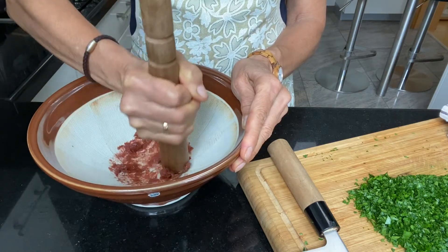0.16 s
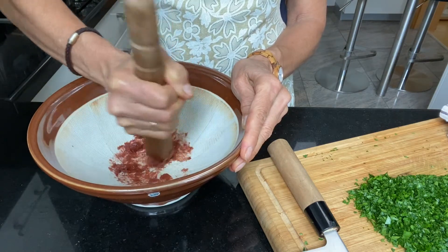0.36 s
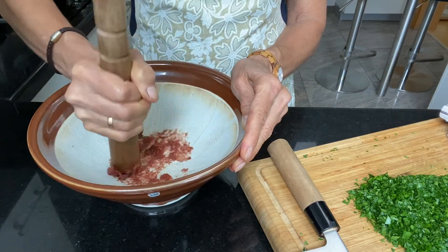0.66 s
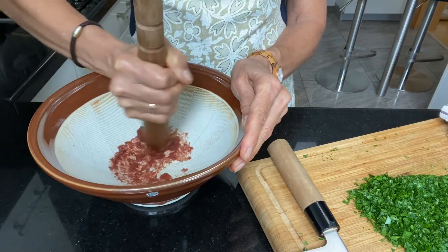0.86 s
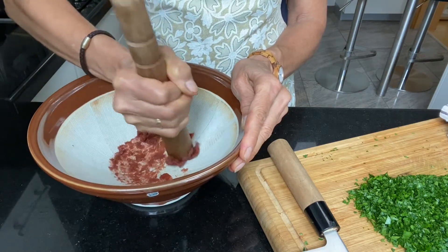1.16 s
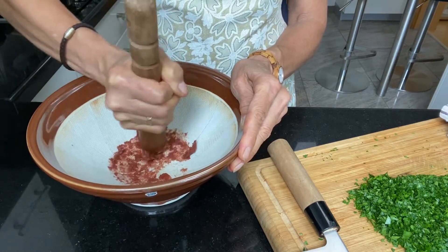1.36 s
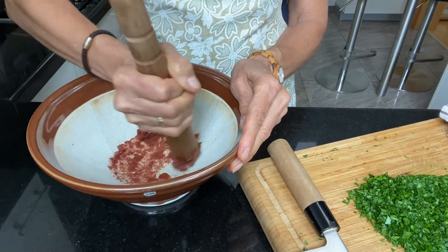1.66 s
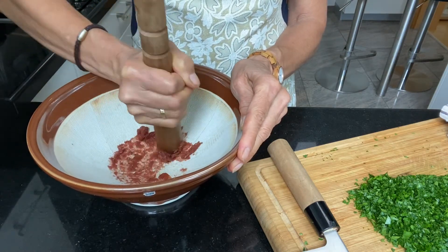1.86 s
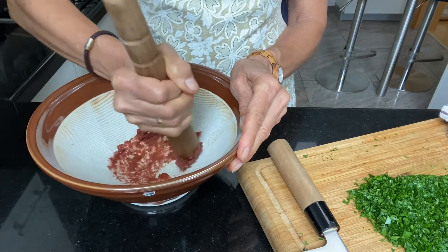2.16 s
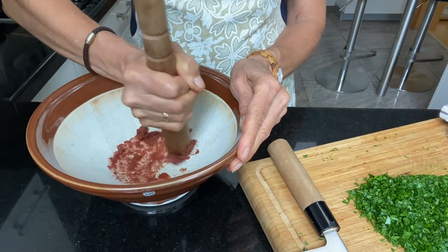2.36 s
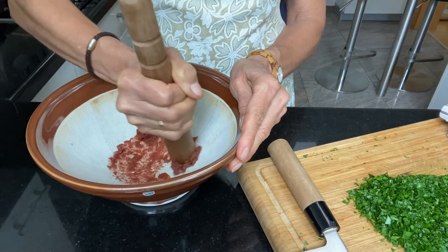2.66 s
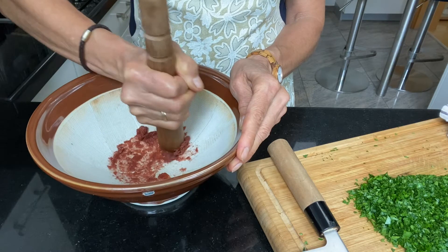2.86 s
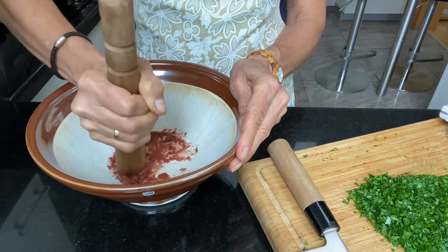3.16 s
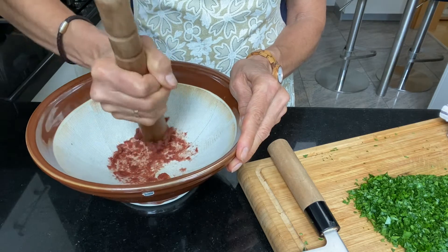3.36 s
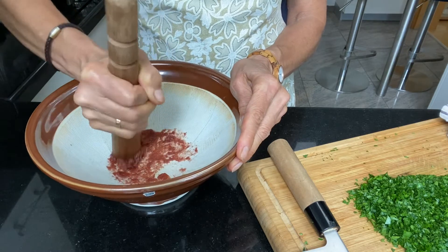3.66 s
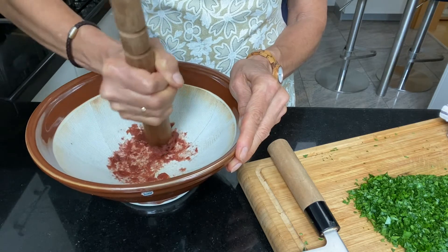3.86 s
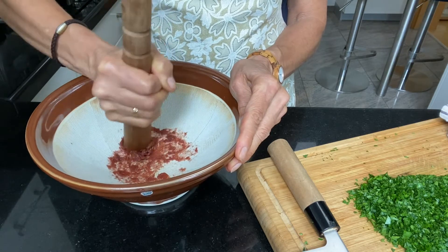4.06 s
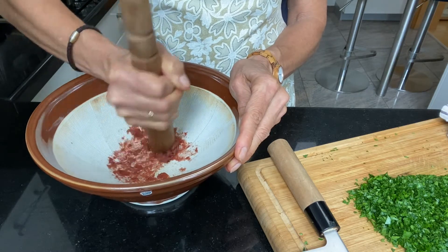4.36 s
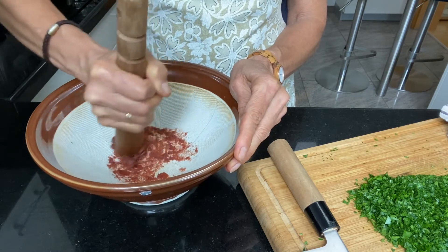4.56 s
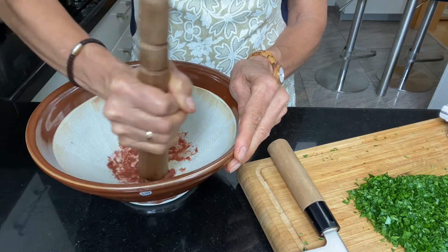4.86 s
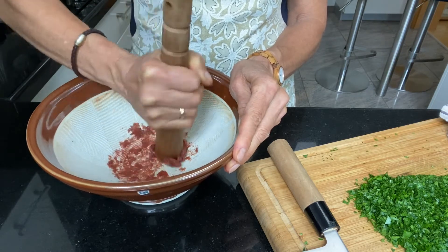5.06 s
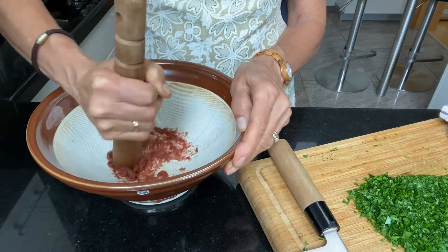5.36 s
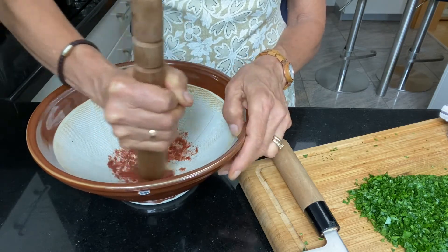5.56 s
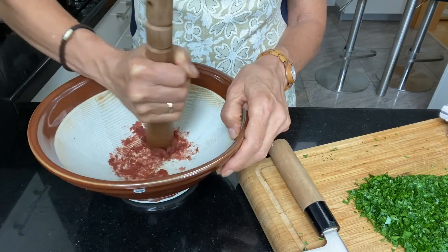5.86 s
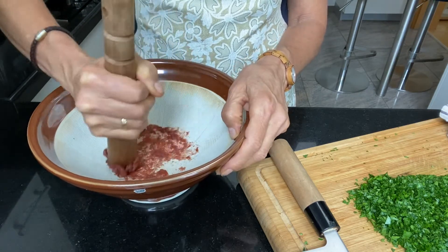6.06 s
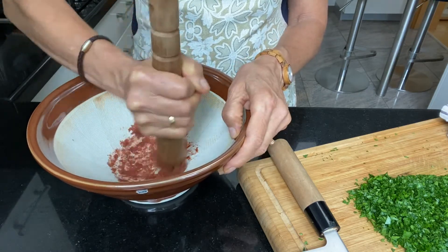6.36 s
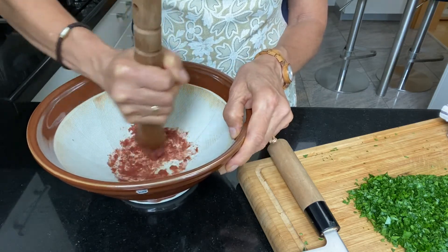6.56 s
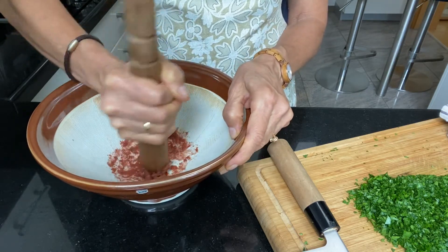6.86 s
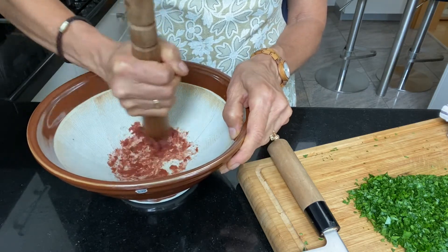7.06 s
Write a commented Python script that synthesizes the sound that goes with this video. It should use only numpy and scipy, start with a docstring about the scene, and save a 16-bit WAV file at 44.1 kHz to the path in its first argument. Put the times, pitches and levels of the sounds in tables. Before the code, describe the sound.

Close, gritty grinding of damp paste in a ceramic bowl, with irregular wooden knocks, short rings and soft thuds.

```python
"""A pestle scrapes and clacks round a ridged ceramic bowl, close up on a stone kitchen counter.
Its wooden tip slips over the ridges and rings the bowl, the push rocks bowl and counter,
and the moist paste hisses and pops. A faint hum, room air and a short kitchen echo lie behind.
The microphone's two ports hear the treble out of step."""
import sys
import numpy as np
from scipy import signal
from scipy.fft import rfft, irfft, next_fast_len
from scipy.io import wavfile
from scipy.ndimage import uniform_filter1d

SR = 44100
rng = np.random.default_rng(int(sys.argv[2]) if len(sys.argv) > 2 else 0)


def pcm_store(signal):
    """Save signal as 16-bit PCM."""
    levels = np.round(np.clip(np.atleast_2d(signal), -1, 1) * 32767)
    wavfile.write(sys.argv[1], SR, levels.astype(np.int16).T)


N = 317961

# pestle strokes: (start [s], length [s], scrape [dB], push [dB], counter shake [dB], hiss [dB], grit [dB])
STROKES = [(-0.12, 0.15, -25, -34.5, -42, -53, -29), (0.055, 0.21, -39.5, -36.5, -44, -56.5, -46.5),
           (0.591, 0.15, -51, -52, -43.5, -55, -55), (0.716, 0.16, -37.5, -39.5, -45, -51, -50),
           (1.125, 0.098, -26.5, -32, -31, -56, -34), (1.267, 0.18, -39, -43.5, -39.5, -53.5, -45.5),
           (1.703, 0.22, -39.5, -47.5, -40, -49, -47.5), (2.12, 0.2, -60, -71, -47, -69, -63),
           (2.312, 0.15, -64, -37.5, -38, -49.5, -40.5), (2.618, 0.086, -42, -40, -34, -73, -79),
           (2.703, 0.13, -33.5, -38, -47, -60, -40.5), (2.762, 0.24, -39.5, -45.5, -39.5, -54, -45.5),
           (2.953, 0.095, -56, -42, -38, -49, -45), (3.345, 0.17, -41, -40.5, -43.5, -63, -45),
           (3.513, 0.17, -59, -40.5, -47, -58, -46.5), (3.831, 0.18, -41, -43, -41, -66, -47),
           (3.951, 0.23, -57, -44.5, -44.5, -54.5, -47.5), (4.213, 0.1, -61, -54, -44, -55, -84),
           (4.317, 0.22, -43.5, -42, -46.5, -53, -44), (4.41, 0.28, -61, -44.5, -47, -56.5, -45.5),
           (4.693, 0.14, -42, -47.5, -47, -53.5, -51), (4.874, 0.35, -47, -49.5, -47.5, -61, -62),
           (5.078, 0.23, -52, -51, -46.5, -60, -44.5), (5.269, 0.11, -43, -36.5, -56, -67, -41.5),
           (5.406, 0.18, -45.5, -45, -51.5, -53.5, -43), (5.582, 0.14, -39, -36, -52, -76, -53),
           (5.694, 0.25, -42, -43.5, -45, -56.5, -48.5), (5.887, 0.18, -54, -47, -47, -59.5, -42.5),
           (6.04, 0.37, -52, -48.5, -55, -55.5, -49.5), (6.313, 0.18, -39.5, -45, -50, -53, -39),
           (6.461, 0.29, -52.5, -43.5, -42.5, -59.5, -42.5), (6.701, 0.18, -46.5, -40.5, -51, -52.5, -44.5),
           (6.861, 0.18, -41.5, -37.5, -48, -54, -69), (7.018, 0.19, -42.5, -41, -44, -49.5, -36)]
# the tip catches a ridge: (time [s], ring [dB], thud re ring [dB], rasp re ring [dB], t60 [s], spot [Hz])
CATCHES = [(0.073, -30, 18.5, -2, 0.077, 640), (0.154, -26, 7, -19, 0.086, 595),
           (0.249, -18, -32, -19, 0.084, 810), (0.611, -40, -2, -10, 0.06, 820),
           (0.716, -31, 8, -3, 0.035, 1300), (0.768, -35, -8, -12, 0.19, 1350),
           (0.937, -31, -13, -37, 0.095, 740), (1.147, -10.5, -5, -40, 0.033, 816),
           (1.164, -49, -13, -30, 0.034, 690), (1.256, -19, -32, -6.5, 0.055, 780),
           (1.299, -17, -26, -16, 0.05, 980), (1.36, -19.5, 1.5, -18, 0.021, 1230),
           (1.74, -26.5, 1, -39, 0.081, 807), (1.782, -15, -14, -15, 0.12, 780),
           (1.822, -20.5, -20, -7, 0.084, 760), (1.853, -32, -15, -4, .09, 1250),
           (2.154, -34, 0.5, -14, 0.05, 650), (2.343, -14.5, -11, -11, 0.065, 760),
           (2.351, -24, -30, -18, 0.048, 1680), (2.397, -15.5, -5, -35, 0.033, 730),
           (2.403, -29, -30, -8, .06, 1700), (2.643, -25.5, 5.5, -44, 0.038, 590),
           (2.727, -24, -1, -7, 0.057, 1060), (2.836, -15, -37, -10, 0.07, 810),
           (2.878, -26, -20, -18, 0.036, 910), (2.921, -17.5, -18, -23, 0.063, 970),
           (3.001, -44, 6, -20, 0.082, 700), (3.315, -36.5, -8, -37.5, 0.057, 630),
           (3.396, -18, -27, -42, 0.064, 750), (3.405, -30, -18, -28, 0.048, 1230),
           (3.56, -27.5, 8.5, 0, 0.053, 586), (3.839, -28, -6, -40, 0.066, 700),
           (4.071, -40, -6, 4, 0.13, 1350), (4.254, -41.5, 17.5, 0, 0.039, 620),
           (4.335, -29, 0.5, -15, 0.086, 650), (4.407, -34, -17, -23, 0.093, 625),
           (4.48, -41, -2, -3.5, 0.32, 619), (4.791, -42, -7, -5, 0.027, 600.4),
           (4.822, -43, -10, -10, 0.019, 1500), (4.925, -45, 17, 2, 0.15, 950),
           (5.112, -27, -30, -41, 0.16, 800), (5.138, -34.5, -24, -31, 0.17, 935),
           (5.163, -29, -15, -22, 0.027, 640), (5.175, -19, -5.5, -24, 0.05, 1230),
           (5.19, -21, -15, -8.5, 0.05, 715), (5.215, -34, -15, -20, .05, 1190),
           (5.296, -25.5, -30, -37, 0.12, 880), (5.445, -27.5, -26, -34, 0.071, 700),
           (5.497, -20.5, -30, -41, 0.12, 820), (5.627, -28, 13.5, -19, 0.054, 620),
           (5.722, -21.5, -12, -13.5, 0.2, 860), (5.742, -21, -4, -26, 0.051, 730),
           (5.785, -21.5, -27, -13, 0.088, 765), (5.822, -40, -9, -29, 0.088, 710),
           (5.893, -30.5, 7, -18, 0.04, 627), (6.19, -40, 3.5, -22, 0.16, 650),
           (6.278, -45, -3, 12, .04, 1290), (6.342, -38.5, 14.5, -5, 0.081, 1290),
           (6.376, -35, 12, -6, 0.045, 646), (6.404, -33, -11, 7, 0.027, 654),
           (6.434, -31, -13, -15, 0.028, 1320), (6.461, -30, -7, -22, 0.047, 646),
           (6.517, -34, -4, -10, 0.054, 900), (6.547, -31.5, 4, -15, 0.03, 650),
           (6.487, -28.5, 3, -25, 0.096, 640), (6.615, -45, 2, -13, 0.027, 1300),
           (6.645, -39, 5, -10, 0.08, 1250), (6.797, -45, -9, -2, 0.13, 800),
           (6.834, -32, -11, -20, 0.038, 710), (6.88, -35, 16, -3, 0.12, 686),
           (6.908, -32.5, -8, 3, 0.03, 649), (6.946, -24, -27, 3, 0.024, 780),
           (6.973, -32.5, -13, -17, 0.029, 1250), (7.04, -34, -5, -20, 0.041, 720),
           (7.127, -29.5, -11.5, -0.5, 0.052, 700)]
# rings of glaze and ridges that colour hiss and rasp: (centre [Hz], width [Hz], boost [dB])
GLAZE = [(2270, 360, 3.5), (4410, 800, 6), (6520, 160, 14), (6970, 100, 10), (7730, 150, 4.5),
         (9300, 270, 2)]
RISE_S = 0.00372  # a contact starts this long before its sharpest rise


def gain_of(db):
    """Decibels to amplitude."""
    return 10 ** (np.asarray(db) / 20)


def evened(x):
    """Scales to rms 1."""
    return x / np.sqrt(np.mean(x ** 2) + 1e-20)


def read(points, hz):
    """A curve's value at hz, on a log frequency axis."""
    f, value = np.transpose(points)
    return np.interp(np.log(hz + 1), np.log(f), value)


def stroke(column, peak, start_db, end_db, onset_s):
    """Gain from a STROKES column: fades in, bends at the share `peak` of each stroke, dies away."""
    out = np.zeros(N)
    for row in STROKES:
        first = max(round(row[0] * SR), 0)
        t = np.arange(first, min(first + SR, N)) / SR - row[0]
        past = t / row[1] - peak
        fall_db = end_db * (abs(past) / (1 - peak)) ** 1.4
        shape_db = np.where(past < 0, start_db * (past / peak) ** 2, fall_db)
        out[first:][:len(t)] += gain_of(row[column] + shape_db) * np.clip(t / onset_s, 0, 1)
    return out


def lumpy(per_s, spread_db, fade_ms, bed):
    """An uneven force: random slips that swell fast and fade, over a steady bed; rms 1."""
    slips = gain_of(spread_db * np.minimum(rng.exponential(1, N), 3)) * (rng.random(N) < per_s / SR)
    for share in (1, .3):  # the fall, then the shorter rise
        slips = signal.lfilter([1], [1, -np.exp(-1000 / (share * fade_ms * SR))], slips)
    return evened(bed + evened(slips))


def bursts(seconds, db, t60, rise_ms, knee):
    """Event envelopes; knee 1 falls exponentially, more holds and lets go; db may have a row per mode."""
    db = np.atleast_2d(db)
    out, t = np.zeros((len(db), N)), np.arange(SR // 5) / SR
    for s, gain, fall in zip(seconds, gain_of(db).T, t60):
        shape = gain_of(-60 * (t / fall) ** knee) * (1 - np.exp(-1000 * t / rise_ms))
        part = out[:, max(round(s * SR), 0):][:, :len(t)]
        part += gain[:, None] * shape[:part.shape[1]]
    return out


def ring(modes, force, own, soft_hz, wander=0., patchy_db=0., blows=0., skirt=0.):
    """Modes driven by blows and noise, partly each one's own; hand and paste vary pitch and strength."""
    out, (shared, other) = np.zeros((2, N)), rng.standard_normal((2, N))
    knots = rng.standard_normal((len(modes), 2, 120))
    forces = force * np.ones((len(modes), 1))
    for (hz, width, db, pan_db, lead), push, knot in zip(modes, forces, knots):
        other = np.roll(other, N // 19)
        drift, patch = (np.interp(np.linspace(0, len(k) - 1, N), range(len(k)), k) for k in knot)
        drive = push * (np.sqrt(1 - own ** 2) * shared + own * other + blows) * gain_of(patchy_db * patch)
        r, turn = np.exp(-np.pi * width / SR), np.exp(2j * np.pi * hz / SR)
        z = signal.lfilter([np.sqrt(1 - r * r)], [1, -r * turn], drive)
        if skirt:  # a second resonance, this many times as wide, builds the ring up softly
            soft = r ** skirt
            z = signal.lfilter([1 - soft], [1, -soft * turn], z)
        z = z * np.exp(2j * np.pi * np.cumsum(wander * hz * drift) / SR)
        out[0] += gain_of(db + pan_db / 2) * (z * np.exp(1j * lead)).real
        out[1] += gain_of(db - pan_db / 2) * z.real
    out /= np.sqrt(np.sum(gain_of(np.array(modes)[:, 2]) ** 2) / 2)
    cushion = signal.butter(2, soft_hz, fs=SR, output="sos")  # wood and paste soften the contact
    return signal.sosfilt(cushion, out)


def at_ports(spectrum, a, b, rings=()):
    """Colours signal a; the microphone's right port hears it phase-shifted and partly replaced by b."""
    # between the ports: (frequency [Hz], left lead [rad], likeness [0-1])
    ports = [(150, 1.5, 1), (920, 2, 0.85), (2380, -1, 0.2), (6050, -1.46, 0.89), (8530, 0.82, 1),
             (10350, 3, 1), (13940, 8, 1), (14900, 8.5, 0.95)]
    size = next_fast_len(N + 4096)
    hz = np.fft.rfftfreq(size, 1 / SR)
    f, lead, alike = np.transpose(ports)
    lead, alike = np.interp(hz, f, lead), np.interp(hz, f, alike)
    rings_db = sum(db / (1 + (2 * (hz - at) / width) ** 2) for at, width, db in rings)
    colour = evened(gain_of(read(spectrum, hz) + rings_db))
    left = rfft(a, size)
    right = alike * left * np.exp(-1j * lead) + np.sqrt(1 - alike ** 2) * rfft(b, size)
    return irfft(np.array([left, right]) * colour, size)[:, :N]


def room_tone():
    """The kitchen at rest: air and two low, wavering hums."""
    # air spectrum: (frequency [Hz], level [dB])
    air = [(60, -32), (150, 0), (270, -13.5), (649, -9.5), (716, -11.5), (1310, -16.5), (1480, -26),
           (2180, -24), (16000, -53)]
    # hums: (pitch [Hz], width [Hz], level [dB], left over right [dB], left lead [rad])
    hums = [(51.3, 2.5, 1, 4.7, 0.13), (122.2, 6.3, -2.8, 1.7, .1)]
    hum = ring(hums, gain_of(-55.5), own=0.94, soft_hz=430)
    return hum + gain_of(-61) * at_ports(air, *rng.standard_normal((2, N)))


def kitchen_echo(x):
    """Sparse reflections of random sign, separate for each port; each band dies at its own speed."""
    # room decay: (frequency [Hz], t60 [s])
    decay = [(200, 0.34), (1000, 0.31), (4000, 0.44), (7000, 0.19), (12000, 0.062)]
    taps, grid = np.zeros((2, SR // 2)), np.arange(200, SR // 2 - 20, 20)
    at = grid + rng.integers(0, 20, (2, len(grid)))
    np.put_along_axis(taps, at, rng.choice([-1., 1.], at.shape), 1)
    hz, t, z = signal.stft(taps, SR, nperseg=256)
    tail = signal.istft(z * gain_of(-60 * t / read(decay, hz)[:, None]), SR, nperseg=256)[1]
    return signal.fftconvolve(x, tail / np.linalg.norm(tail[0]), axes=1)[:, :N]


def counter_shake():
    """Each stroke shakes the stone counter under the bowl."""
    # counter modes: (pitch [Hz], width [Hz], level [dB], left over right [dB], left lead [rad])
    modes = [(51.3, 150, -5, 3.9, 0.45), (60.6, 14.7, 8.5, 4.4, 0.087), (93, 71, -2, 2.8, 0.12)]
    shake = stroke(column=4, peak=0.7, start_db=11.5, end_db=-5.5, onset_s=0.18)
    return ring(modes, shake, own=0.91, soft_hz=400)


def foot_thuds(blows):
    """Pushes and catches rock the bowl's foot against the counter."""
    # foot modes: (pitch [Hz], width [Hz], level [dB], left over right [dB], left lead [rad])
    modes = [(204, 7.8, 1.5, 2.4, 0.032), (278, 15, 4, 2.5, 0.84), (284, 86, -2.5, 1.9, 0.2),
             (152, 230, -14.5, 4.3, 0.065)]
    s, db, thud_db, _, t60, spot_hz = np.transpose(CATCHES)
    # a low catch favours the low modes
    lean_db = 5.5 * np.log2(np.array(modes)[:, :1] / 240) * np.clip(4 * np.log2(spot_hz / 800), -3, 3)
    push = stroke(column=3, peak=0.59, start_db=-7, end_db=-12, onset_s=0.17) * lumpy(40, 1.1, 5.0, 1.8)
    thuds = bursts(s - RISE_S, db + thud_db + lean_db, 0.52 * t60, rise_ms=6.1, knee=1.09)
    return ring(modes, push + thuds, own=0.81, soft_hz=710, blows=0.34 * blows, skirt=6.2)


def paste(crunch, scrapes):
    """Moist paste hisses in two bands that flicker apart, ticks with bubbles and pops as it lets go."""
    # pops: (time [s], level [dB], centre [Hz], fizz re pop [dB])
    pops = [(0.066, -35, 4250, -12), (0.157, -45, 7100, -10), (0.231, -37.5, 4300, -23),
            (0.598, -31.5, 7550, -15), (0.661, -39, 4400, -38), (0.6854, -35, 7090, -23),
            (0.709, -29, 12200, -22), (0.755, -42, 3750, -24), (0.793, -39, 4900, -9.5),
            (0.869, -38.5, 13300, -36), (1.135, -38, 3700, -15.5), (1.1812, -28.5, 6400, -19),
            (1.2524, -32.5, 3730, -19), (1.2984, -35.5, 4360, -16), (1.357, -40.5, 6520, -11),
            (1.684, -48.5, 12500, -12), (1.712, -42, 13000, -20), (1.7796, -51, 6550, -12),
            (1.976, -34.5, 11200, -37), (2.2154, -40, 13000, -32), (2.223, -44, 12800, -16),
            (2.329, -38, 6800, -6.5), (2.379, -38, 7740, -4.5), (2.722, -46.5, 4540, -7),
            (2.7506, -47, 8200, -3.5), (2.824, -44, 6450, -8), (3.387, -39.5, 7800, -11),
            (3.445, -36, 13500, -19), (3.466, -34, 6760, -19), (3.557, -44, 4470, -9),
            (3.7, -43, 13400, -12), (3.893, -26.5, 5440, -27), (3.924, -36, 6740, -11),
            (4.199, -39, 9100, -35), (4.2155, -34, 13100, -30), (4.3265, -49, 7120, -17),
            (4.405, -35.5, 6360, -20), (4.445, -30, 6200, -24), (4.895, -50, 7100, -2),
            (4.926, -44, 6890, -8), (4.9761, -45, 7120, -28), (5.01, -37.5, 4170, -16),
            (5.0843, -42.5, 8200, -15), (5.181, -41.5, 6550, -7), (5.415, -38, 11600, -17),
            (5.595, -45, 4260, -19), (5.622, -34, 4030, -16), (5.692, -46, 4560, -26),
            (5.726, -41, 6200, -1.5), (5.7788, -48, 8000, -4), (5.89, -41, 4010, -13),
            (5.939, -36.5, 4060, -43), (6.0872, -42.5, 8210, -9), (6.213, -31, 4140, -24),
            (6.3373, -38, 3870, -17), (6.509, -29, 4340, -20), (6.55, -33, 6500, -18),
            (6.643, -37, 6480, -9.5), (6.7176, -43, 7800, -18), (6.878, -34.5, 6300, -9),
            (6.9435, -42, 7950, -25), (3.472, -36, 7000, -12), (3.377, -47, 7000, -12),
            (1.24, -44, 9000, -23), (1.329, -45, 13000, -25), (4.095, -42, 7500, -16),
            (4.369, -47, 7000, -25), (4.395, -42, 9100, -25), (5.37, -44.5, 6960, -17),
            (5.472, -45, 8750, -13), (0.844, -37, 5530, -44), (3.141, -52, 8000, -14),
            (4.009, -37, 4430, -24), (7.1, -38, 5060, -10)]
    # wet spectrum: (frequency [Hz], level [dB])
    spectrum = [(1500, -9), (3000, -7.5), (5000, -10), (6000, -5), (6700, -5), (8000, -1.5), (10000, -0.5),
                (13000, -4.5), (14500, -1.5), (16000, -30)]
    s, db, hz, fizz_db = np.transpose(pops)
    fizz_t60 = np.full(len(s), 0.075)
    tilt_db = 5.5 * np.log2(hz / 7500)  # a high pop fizzes high
    wet = stroke(column=5, peak=0.56, start_db=-4, end_db=-9.5, onset_s=0.2)
    spray = stroke(column=5, peak=0.27, start_db=15, end_db=-9.5, onset_s=0.3)
    squeezed = wet * (0.26 + 0.58 * crunch) + gain_of(-14) * scrapes
    coarse = squeezed + bursts(s, db + fizz_db - tilt_db, fizz_t60, rise_ms=5.9, knee=1.135)
    fine = bursts(s, db + fizz_db + tilt_db, 1.66 * fizz_t60, rise_ms=2.7, knee=0.73)
    fine += spray * lumpy(70, 5.2, 4.9, 0.29)
    noise = rng.standard_normal((2, N))
    low = signal.sosfiltfilt(signal.butter(4, 10000, fs=SR, output="sos"), noise)
    hiss = gain_of(2.5) * at_ports(spectrum, *(coarse * low + fine * (noise - low)), GLAZE)
    bubbles = wet * gain_of(18.5 + 4.7 * rng.standard_normal(N)) * (rng.random(N) < 22 / SR)
    clicks = np.diff(bubbles, 2, append=[0, 0])  # tiny bubbles tick brightly
    t = np.arange(1024) / SR
    for at, level_db, f, spit in zip(s, db, hz, rng.standard_normal((len(pops), 1024))):
        snap = np.cos(2 * np.pi * f * t) * np.exp(-t / 0.00043) + .4 * spit * np.exp(-t / 0.0015)
        if f < 5000:  # air squeaks out of the lower pops
            squeak = 0.18 * np.sin(2 * np.pi * f * t) * np.sin(np.pi * t / t[-1]) ** 2
            snap += squeak * (1 + 1.3 * uniform_filter1d(spit, 40))
        part = clicks[round(at * SR):][:1024]
        part += gain_of(level_db) * snap[:len(part)]
    return hiss + at_ports(spectrum, clicks, np.roll(clicks, 9))


def short_scrapes(grinding):
    """Gritty scrapes: their envelope, and the bowl's high rings that they and the grinding excite."""
    # scrapes: (time [s], grit [dB], favoured pitch [Hz], t60 [s], ring re grit [dB])
    scrapes = [(0.064, -40, 1870, 0.045, 5), (0.152, -34.5, 1900, 0.059, 4), (0.243, -34, 1930, 0.044, 0),
               (0.586, -61, 4530, 0.045, -4), (0.625, -42, 2210, 0.049, -11),
               (0.66, -34.5, 2210, 0.028, -5), (0.699, -39, 2170, 0.057, -10), (0.767, -40, 1960, 0.037, 0),
               (0.797, -38, 2010, 0.072, -2.5), (0.822, -39, 2090, 0.039, -2), (0.937, -58, 2400, 0.07, 2),
               (1.138, -55, 2120, 0.027, -12), (1.185, -36, 1900, 0.037, 0), (1.218, -33, 2030, 0.056, -11),
               (1.2535, -36, 2130, 0.039, -1), (1.303, -31, 1900, 0.041, -3), (1.357, -36, 2190, 0.089, 0),
               (1.733, -46, 1900, 0.06, -5), (1.776, -36.5, 2190, 0.054, 2), (1.911, -40, 1900, 0.052, -5),
               (2.23, -51, 2190, 0.028, 4), (2.326, -35.5, 1910, 0.078, -2),
               (2.645, -54.5, 2190, 0.029, 10), (2.72, -44, 1900, 0.041, 0), (2.763, -52, 2150, 0.041, -1),
               (2.823, -32, 1930, 0.079, -5), (2.91, -31, 1950, 0.048, -6), (3.009, -41, 2170, 0.15, -6),
               (3.386, -39, 1930, 0.058, -13), (3.479, -35, 2090, 0.055, -2), (3.551, -41, 2190, 0.045, 0),
               (3.571, -32.5, 1950, 0.049, -3), (3.838, -49.5, 2400, 0.052, -6),
               (3.894, -46, 5070, 0.036, -6), (3.979, -40, 2020, 0.051, -7),
               (4.007, -30, 2190, 0.042, -2.5), (4.062, -45, 2140, 0.052, 6), (4.162, -48, 1920, 0.038, -6),
               (4.253, -43, 1890, 0.034, 0), (4.329, -40, 2010, 0.045, -3), (4.36, -57, 2150, 0.036, -7),
               (4.448, -40, 4450, 0.048, -6), (4.485, -51, 2190, 0.045, 2), (4.695, -46, 2160, 0.14, -14),
               (4.787, -44.5, 1980, 0.041, -0.5), (4.822, -38.5, 3990, 0.038, -1),
               (4.894, -42, 1900, 0.1, -4), (4.927, -37.5, 2060, 0.044, 3), (4.978, -37, 1950, 0.022, 7),
               (5.011, -30.5, 2010, 0.049, -3), (5.051, -31, 2210, 0.034, -5),
               (5.183, -45, 2110, 0.045, -15), (5.596, -43.5, 4090, 0.077, 2.5),
               (5.625, -37, 3940, 0.035, 7.5), (5.677, -43, 2170, 0.042, 0),
               (5.689, -35.5, 2180, 0.057, -5), (5.72, -34, 2160, 0.067, -4),
               (5.78, -33.5, 2060, 0.049, -3), (5.922, -55, 2050, 0.038, -13), (5.94, -38, 4020, 0.047, -5),
               (6.077, -50, 2120, 0.041, 0), (6.215, -39, 4060, 0.045, 0), (6.339, -39, 2190, 0.06, 3),
               (6.428, -44, 2240, 0.034, 0), (6.484, -27, 1900, 0.022, -2), (6.519, -31, 3940, 0.036, -14),
               (6.552, -43, 1930, 0.12, -7), (6.612, -46, 1930, 0.079, 3), (6.876, -46, 2240, 0.034, -1),
               (6.884, -37, 2020, 0.033, 0), (6.907, -32, 2200, 0.042, 2), (6.944, -36, 2120, 0.04, -15),
               (6.973, -40, 2080, 0.045, 1.5), (7.01, -42.5, 2000, 0.079, -5),
               (7.028, -43, 1900, 0.049, -6)]
    # high bowl modes: (pitch [Hz], width [Hz], level [dB], left over right [dB], left lead [rad])
    modes = [(1930, 110, 2, 0.72, 0.57), (2171, 96, -1, 0.47, -0.27), (3920, 120, -3.5, 0, -.8),
             (4513, 200, -4, 0, -1.1), (6540, 49, -6, 0, -1.8), (7160, 36, -2.5, 0, -1.1),
             (8080, 90, -5, 0, 0.68)]
    s, db, spot_hz, t60, ring_db = np.transpose(scrapes)
    favour_db = np.maximum(-30 * np.log2(np.array(modes)[:, :1] / spot_hz) ** 2, -5.0)
    force = bursts(s - RISE_S, db + ring_db + favour_db, t60, rise_ms=3.3, knee=0.92)
    force += gain_of(-8.5) * grinding
    rings = ring(modes, force, own=0.92, soft_hz=11500, wander=.015, patchy_db=5)
    return bursts(s - RISE_S, db, t60, rise_ms=7.8, knee=0.97), rings


def ridge_rasp(friction):
    """Grit rasps on the ridges, flaring at each catch."""
    # grit spectrum: (frequency [Hz], level [dB])
    spectrum = [(600, 8.5), (1300, 10.5), (2150, -2.5), (2500, -7.5), (3300, -10.5), (4100, -10.5),
                (5000, -13.5), (7000, -42)]
    s, db, _, rasp_db, t60, _ = np.transpose(CATCHES)
    force = friction + bursts(s - RISE_S, db + rasp_db, t60, rise_ms=8.5, knee=0.91)
    return gain_of(2.5) * at_ports(spectrum, *(force * rng.standard_normal((2, N))), GLAZE)


def pestle_clack(blows):
    """The pestle's wood answers every catch with a dull clack."""
    # wood modes: (pitch [Hz], width [Hz], level [dB], left over right [dB], left lead [rad])
    modes = [(797, 190, 4.5, -10, -1.5), (1080, 200, 3, -1, 0.5), (1361.5, 60, -2, 9, 1.1)]
    s, db, _, _, t60, _ = np.transpose(CATCHES)
    force = bursts(s - RISE_S, db - 11, 1.07 * t60, rise_ms=2.9, knee=1.19)
    return ring(modes, force, own=0.89, soft_hz=1730, wander=.06, blows=0.28 * blows, skirt=6.3)


def bowl_ring(blows):
    """The tip rubs and catches the ridges; the spot where it lands decides which modes answer."""
    # ceramic modes: (pitch [Hz], width [Hz], level [dB], left over right [dB], left lead [rad])
    modes = [(405.2, 22, -19, 23, 1.4), (497.7, 12.6, -3, -7.5, -1.15), (634, 30, -3, 7, 1.06),
             (690, 26, 3, 5, 0.55), (808, 29.5, -0.5, -4, -0.02), (908, 43, -3.5, -3, -1.8),
             (1110, 52, -15.5, 19, 0.66), (1224, 26, -2.5, 7, 0.75), (1294, 70, -0.5, -5.5, 0.48),
             (1528, 25, -9, 12, -0.71), (1689.5, 31, -4, 7.5, 1.46), (1855, 30, -12.5, -2, 1.9)]
    # each mode under rubbing: (gain [dB])
    rubbed_db = [13.5, 1.5, 11.5, -57, -16.5, 4, 3, 0.5, 3.5, -2.5, -13, -9]
    s, db, _, _, t60, spot_hz = np.transpose(CATCHES)
    favour_db = np.maximum(3.5 - 58.0 * np.log2(np.array(modes)[:, :1] / spot_hz) ** 2, -9.0)
    pressure = stroke(column=2, peak=0.51, start_db=-3.5, end_db=-18.5, onset_s=0.19)
    rubbing = gain_of(rubbed_db)[:, None] * pressure * lumpy(120, 7.9, 2.96, 0.31)
    force = rubbing + bursts(s - RISE_S, db + favour_db - 13.5, t60, rise_ms=1.6, knee=1.75)
    return ring(modes, force, own=0.862, soft_hz=2030, wander=0.00399, patchy_db=1.5,
                blows=blows, skirt=6.7)


def scene():
    """Bowl and paste close to the microphone, the kitchen behind; thuds come through the counter."""
    crunch = lumpy(per_s=55, spread_db=5.6, fade_ms=4.6, bed=0.67)  # bits of food giving way
    grinding = crunch * stroke(column=6, peak=0.5, start_db=-6, end_db=-17, onset_s=0.22)
    scrapes, high_rings = short_scrapes(grinding)
    blow_s = np.array(CATCHES)[:, 0] - RISE_S + 0.002  # the first hard touch of each catch
    blows = np.zeros(N)
    blows[np.round(blow_s * SR).astype(int)] = gain_of(32)
    body = bowl_ring(blows) + pestle_clack(blows) + ridge_rasp(grinding + scrapes) + high_rings
    wet = paste(crunch, scrapes)
    echo = kitchen_echo(gain_of(-8) * body + gain_of(-14) * wet)
    return room_tone() + echo + counter_shake() + foot_thuds(blows) + wet + body


def record(dry):
    """The microphone's bass cut, then the band limit."""
    thinned = signal.sosfilt(signal.butter(6, 42, "high", fs=SR, output="sos"), dry)
    band_limit = signal.firwin(511, 16450, window=("kaiser", 9), fs=SR)
    return signal.oaconvolve(thinned, band_limit[None], "same")


dry = scene()
out = record(dry)
pcm_store(out)
```